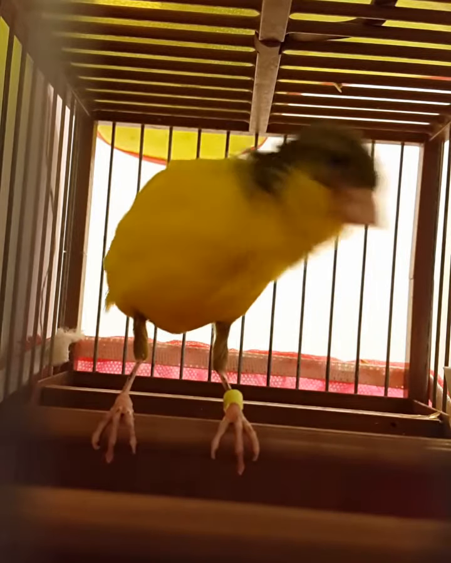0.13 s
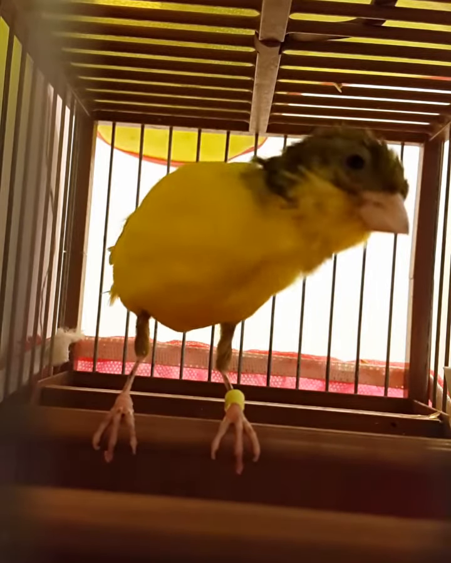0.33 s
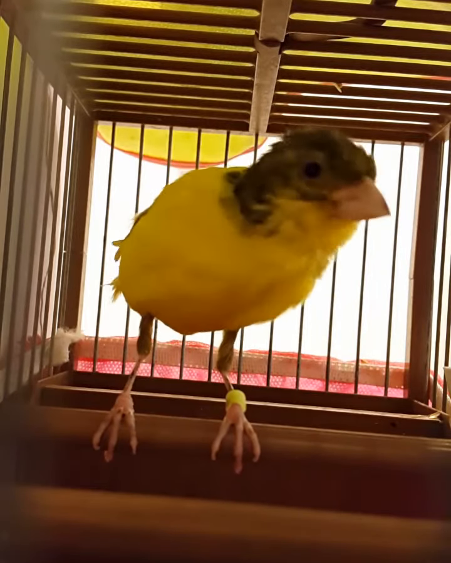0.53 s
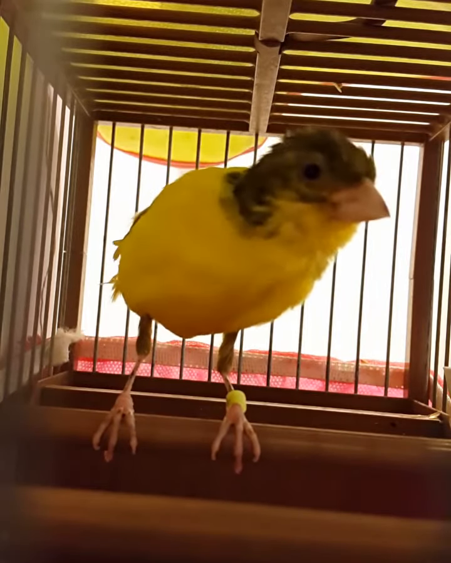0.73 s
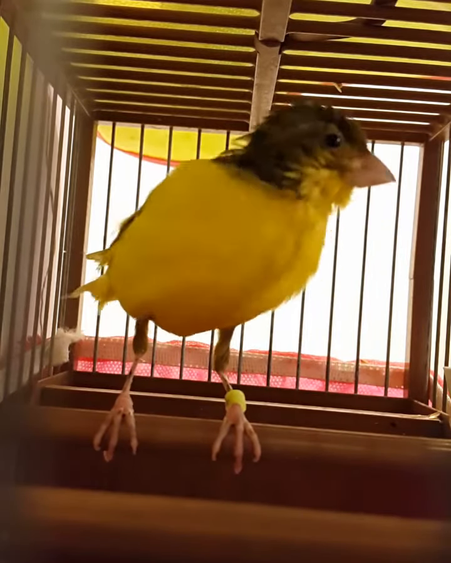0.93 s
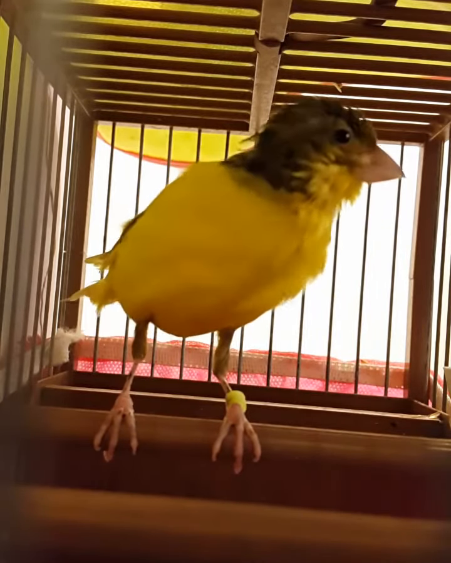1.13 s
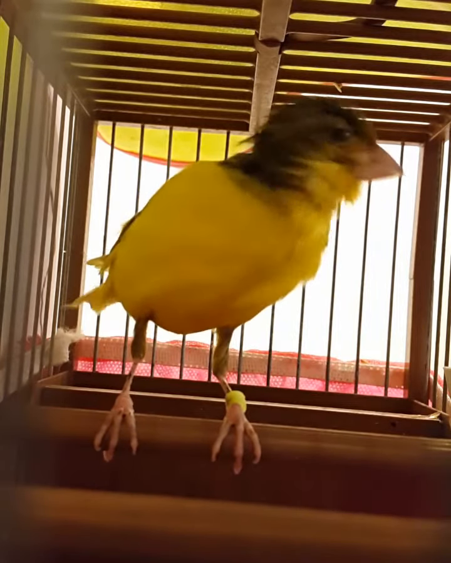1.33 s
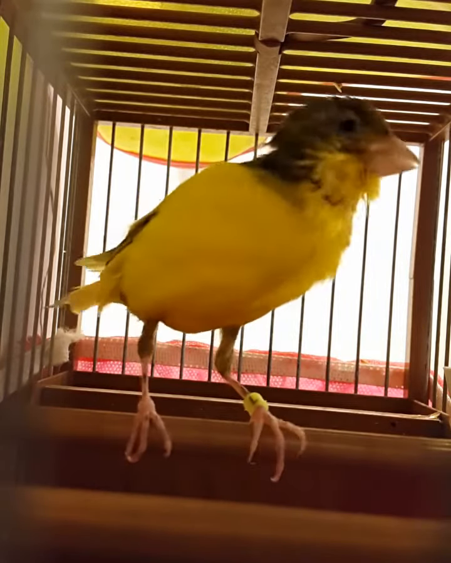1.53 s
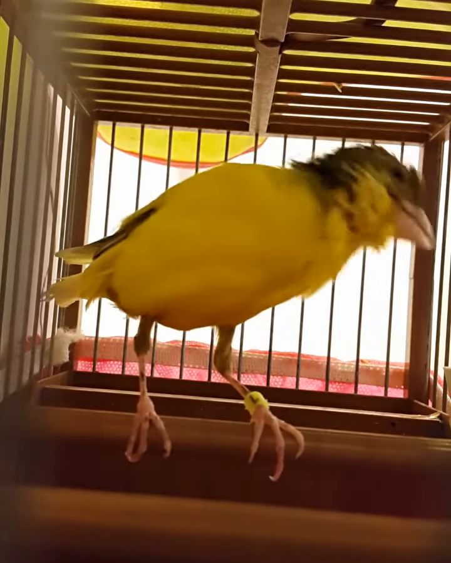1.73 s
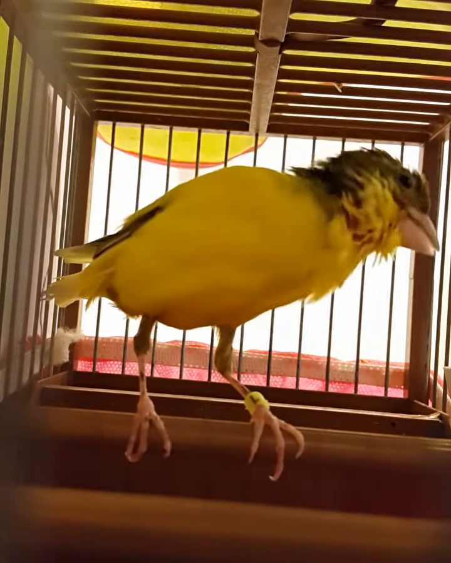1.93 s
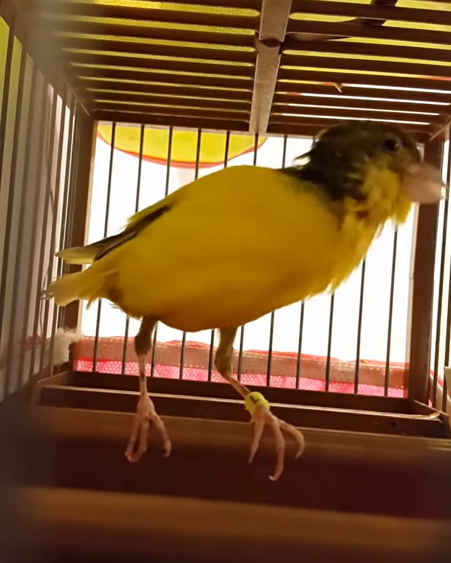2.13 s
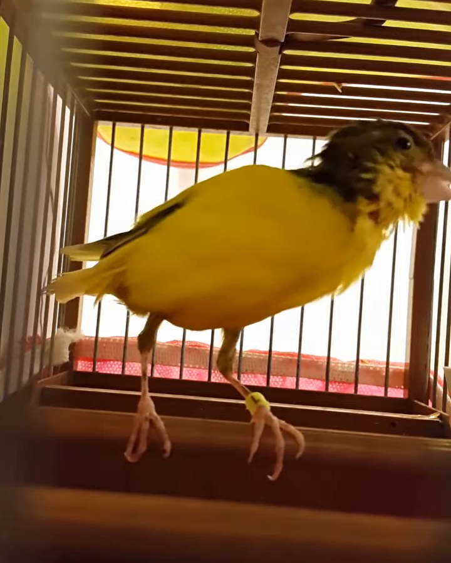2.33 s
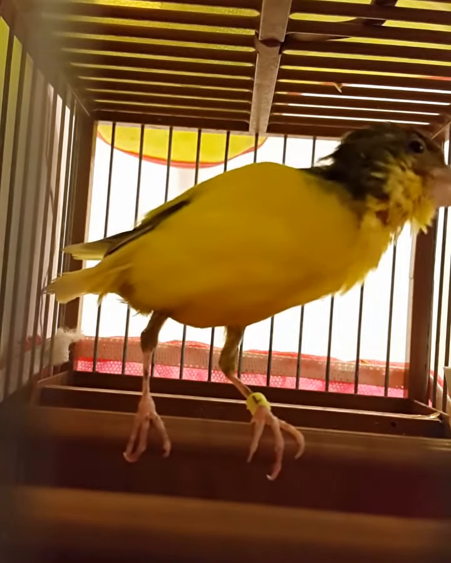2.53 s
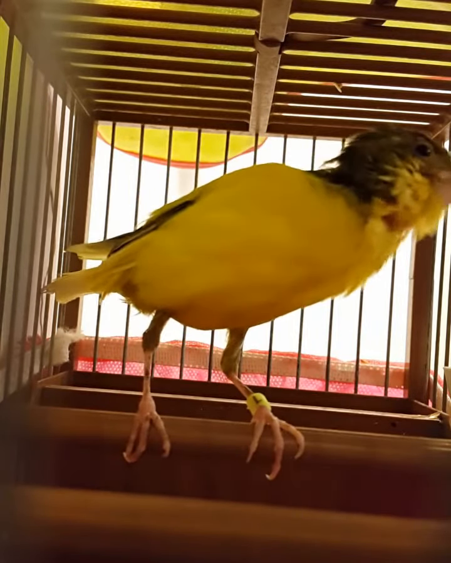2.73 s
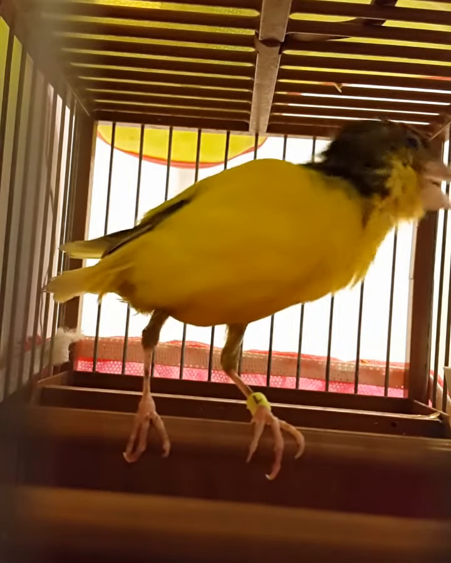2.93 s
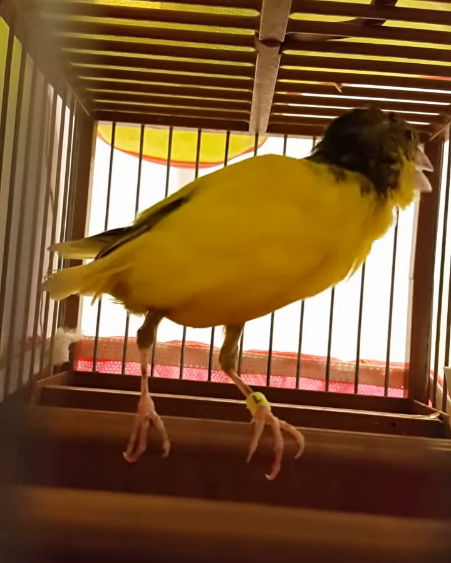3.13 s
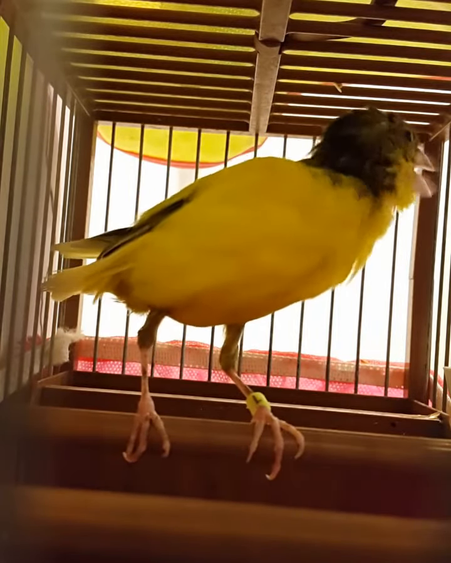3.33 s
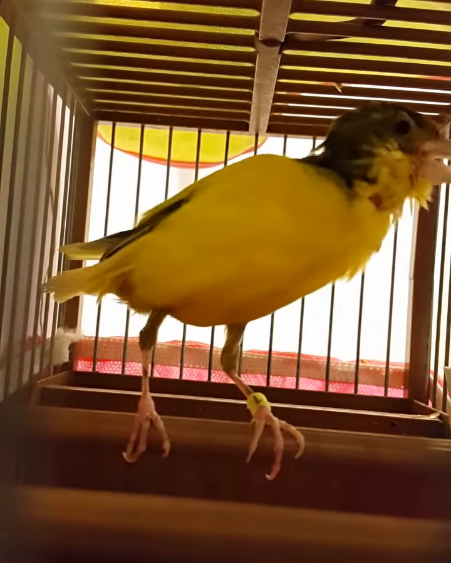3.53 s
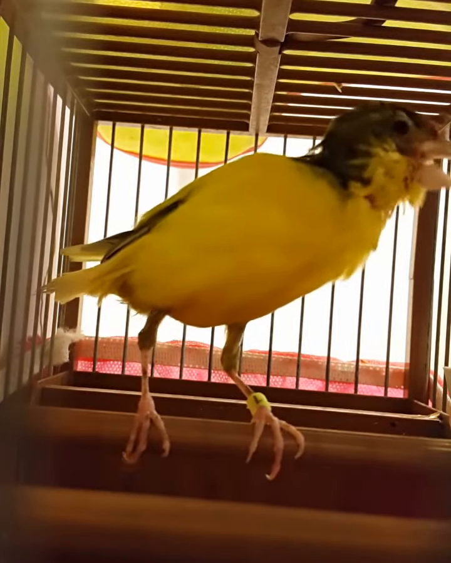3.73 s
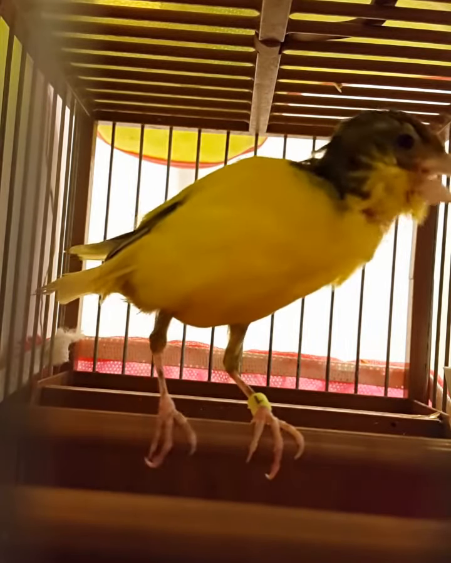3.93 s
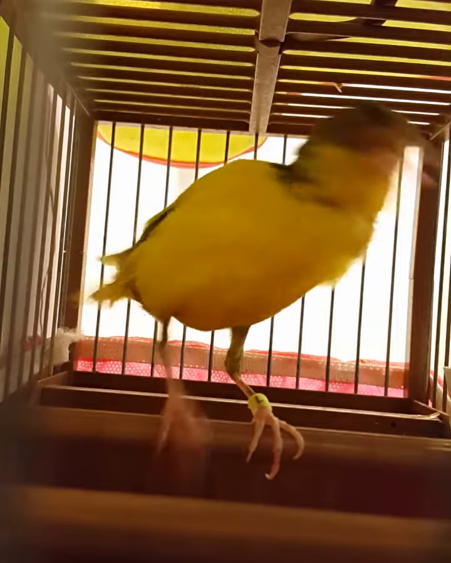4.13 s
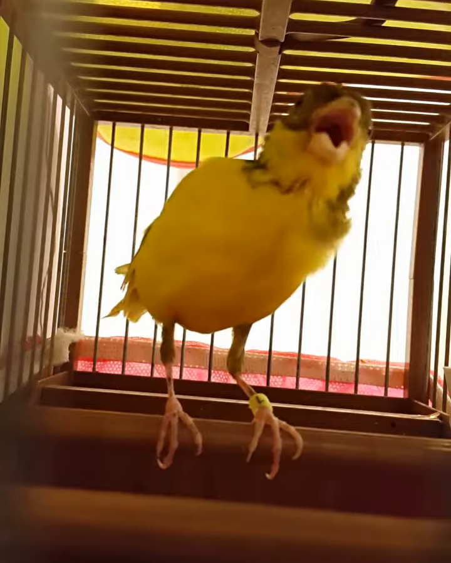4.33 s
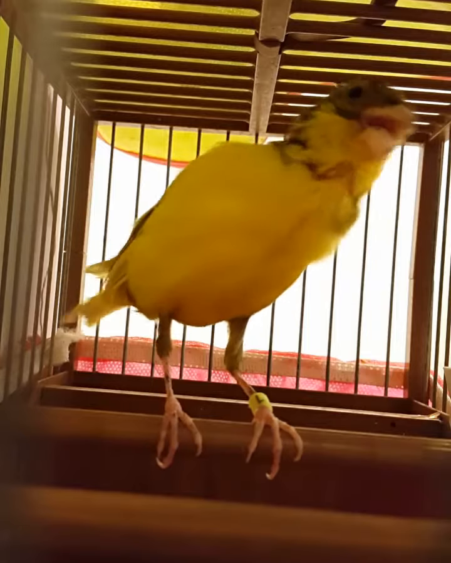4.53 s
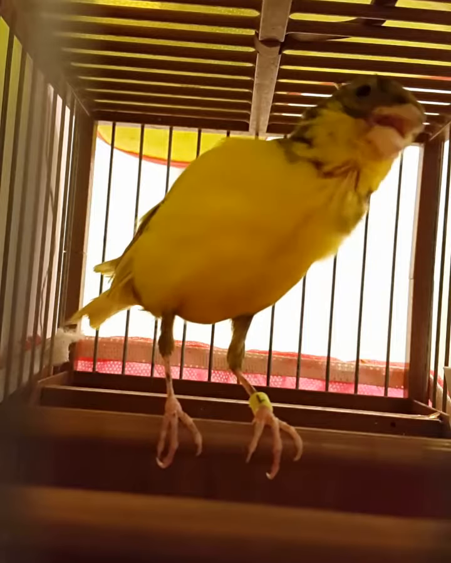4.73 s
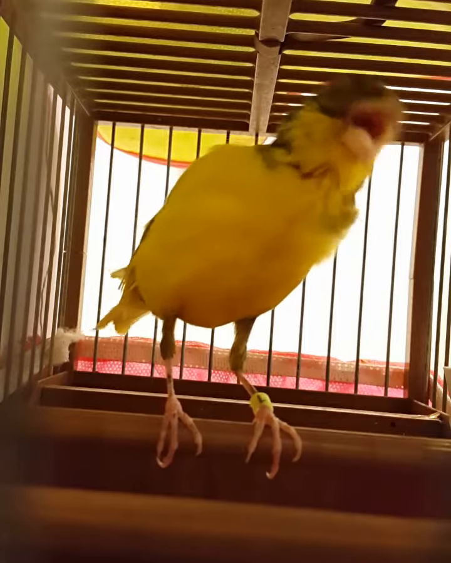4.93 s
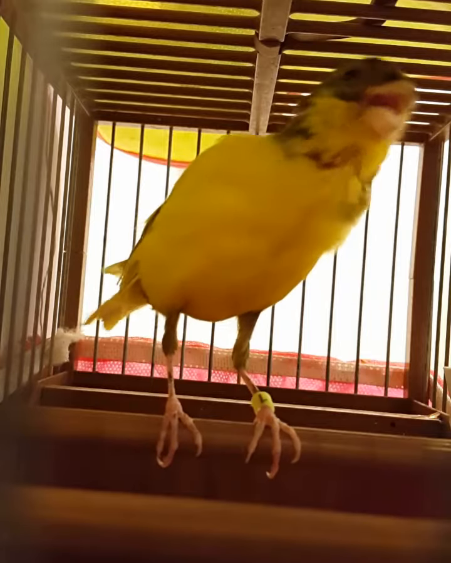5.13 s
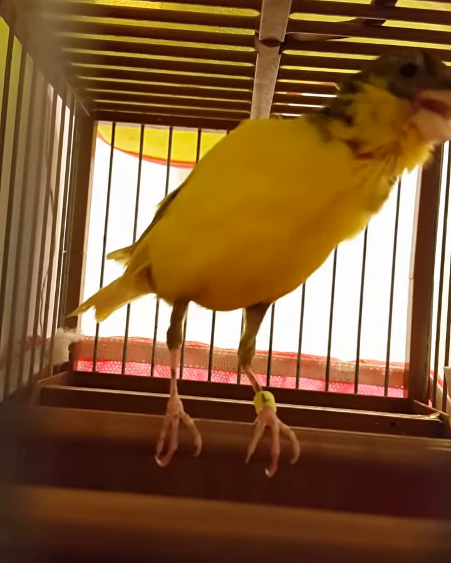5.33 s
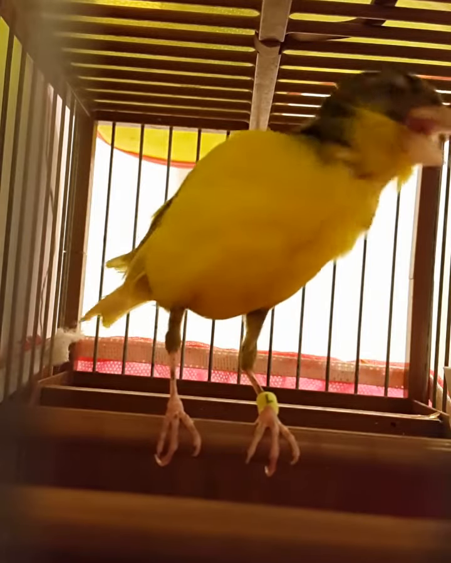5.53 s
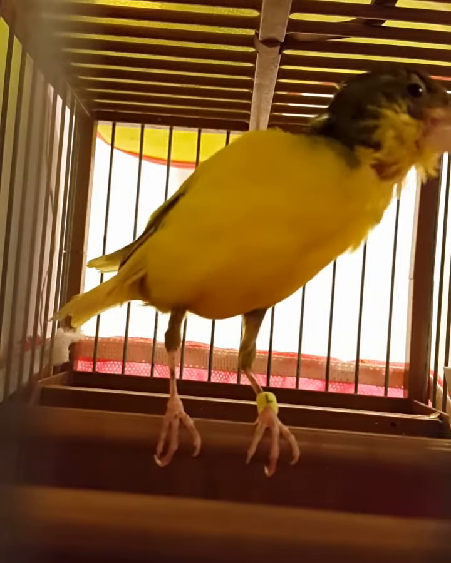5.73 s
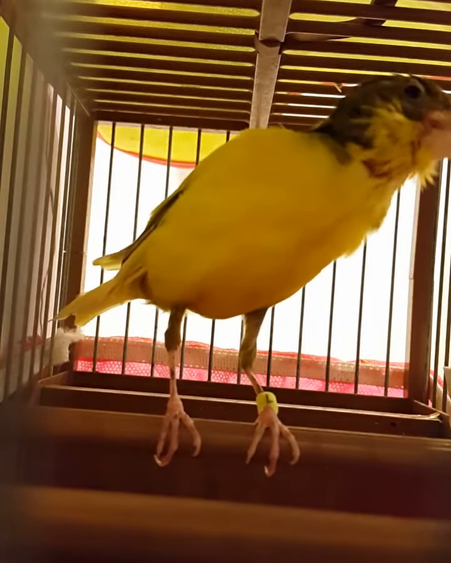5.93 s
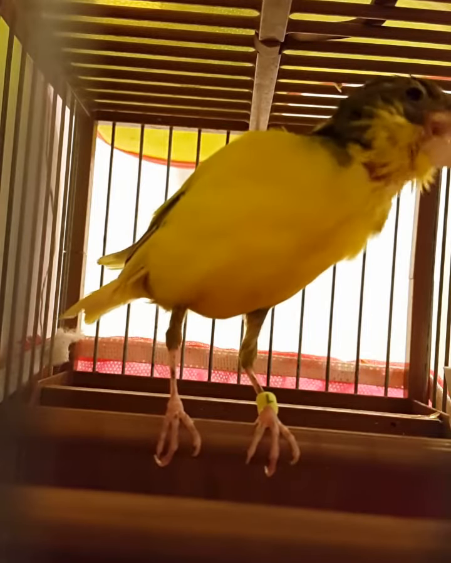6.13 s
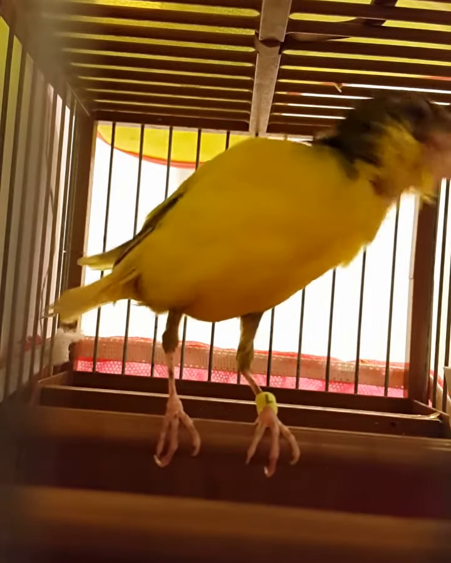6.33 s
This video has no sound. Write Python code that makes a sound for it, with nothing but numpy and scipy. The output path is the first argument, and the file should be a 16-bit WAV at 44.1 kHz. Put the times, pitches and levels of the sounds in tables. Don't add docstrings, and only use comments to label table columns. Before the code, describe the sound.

Quiet street rumble and tiny cage ticks, then a nearby canary whistles piercingly three times and breaks into a rapid two-note trill.

```python
import sys
import numpy as np
from scipy import signal
from scipy.io import wavfile
from scipy.ndimage import uniform_filter1d

SR = 44100
rng = np.random.default_rng(int(sys.argv[2]) if len(sys.argv) > 2 else 0)


def store_wav(level_fs):
    pcm = np.round(np.clip(np.atleast_2d(level_fs), -1, 1) * 32767)
    wavfile.write(sys.argv[1], SR, pcm.T.astype(np.int16))


def field_ratio(decibels):
    return 10 ** (np.asarray(decibels, dtype=float) / 20)


N = 286209

# freq_hz, level_db (per Hz)
AIR_SPECTRUM = [(24, -35.5), (41, -21), (53, 1.5), (80, -12), (116, 0.5), (150, -6), (350, -9),
                (420, -15.5), (1000, -22.5), (3800, -36.5), (4700, -27.5), (6600, -32), (7300, -41.5),
                (15600, -40)]
# freq_hz, likeness (0 to 1)
AIR_LIKENESS = [(60, 0.9), (180, 1), (550, 0.3), (1650, 0.19), (4970, 0.23), (15000, 0.02)]
# freq_hz, left_over_right_db
AIR_LEAN = [(60, 0.5), (180, 2.5), (550, 0.5), (1650, 0), (4970, 9), (15000, 0)]
# start_s (centre), spread_s, level_db (over the air), centre_hz
SWISHES = [
    (0.05, 0.42, -5, 1200),
    (2.619, 0.28, 0.5, 2700),
    (3.542, 0.22, 10, 1200),
    (5.852, 0.14, 5.5, 1900),
    (2.25, .2, 4.5, 70),
    (4.12, .13, 4, 80),
    (5.35, .12, 4.5, 2300),
]
# start_s, peak_db, ring_hz, snap_top_hz, left_over_right_db
TICKS = [(.109, -50, 1370, 2500, -5), (.139, -55.5, 1220, 1800, -12), (0.488, -39, 224, 350, 3),
         (1.584, -41, 310, 4500, -14.5), (1.661, -60.5, 5800, 6500, 6), (1.721, -60, 6000, 6500, 6),
         (2.389, -42.5, 210, 896, 1), (2.704, -58.5, 495, 4000, 11), (3.814, -34.5, 176, 1440, 1.5),
         (4.756, -36.5, 190, 3200, 21), (5.516, -42, 190, 1500, 29), (5.975, -56.5, 2740, 5000, 5)]
# start_s, length_s, pitch_hz, glide_hz, level_db
HOOTS = [(.0, 0.052, 482, 46, -60), (0.301, 0.27, 255.2, -0.5, -58), (0.302, 0.23, 955, -11, -70),
         (1.127, 0.068, 350, -3, -58), (1.716, 0.087, 422, 1.5, -57.5), (2.068, 0.082, 462, 25.5, -59),
         (2.2, 0.045, 463, -4.5, -58), (3.18, 0.13, 191.3, 54, -52.5), (3.236, 0.19, 251, -13, -49),
         (3.404, 0.06, 221, -32, -55.5), (.435, 0.038, 3400, -40, -73), (.5, 0.055, 2780, -58, -75),
         (.55, .06, 2500, -30, -75), (1.338, 0.053, 2390, -100, -72.5), (2.447, 0.079, 2150, 399.5, -71),
         (5.784, 0.13, 1935, -120, -68)]
# freq_hz, t60_s
ROOM_DECAY = [(4000, 0.23), (7000, 0.25), (15000, 0.2)]
# time_s, pitch_hz, level_db
WHISTLES = [
    [(1.33, 5450, -57), (1.42, 5296, -47), (1.5, 5102, -27.5), (1.7, 4973, -23), (1.9, 5062, -23.5),
     (2.02, 5000, -20.5), (2.08, 4895, -19), (2.205, 4967, -20.5), (2.24, 5129, -20.5)],
    [(2.315, 6830, -52.5), (2.345, 6380, -40), (2.37, 6110, -22), (2.44, 6058, -20), (2.495, 6120, -18),
     (2.655, 5793, -23.5), (2.697, 5990, -18.5), (2.725, 5676, -20), (2.758, 5625, -23.5)],
    [(2.815, 6500, -45.5), (2.85, 6760, -40), (2.885, 6814, -15.5), (3.03, 7007, -19), (3.1, 7044, -17.5),
     (3.135, 6970, -19.5), (3.146, 6550, -26.5)],
]
# time_s, beats (counted so far), pitch_swing_hz
FLUTTER = [
    [(1.33, -13, 8), (1.512, 0, 16), (1.629, 8, 20), (1.661, 10, 14), (1.753, 15, 14), (1.838, 23, 45),
     (1.875, 27, 30), (1.947, 34, 50), (2.024, 41, 55), (2.07, 44, 40), (2.102, 46, 28), (2.201, 56, 38),
     (2.237, 59, 15)],
    [(2.31, -6, 6), (2.394, 0, 10), (2.453, 4, 20), (2.528, 9, 12), (2.603, 15, 35), (2.652, 18, 25),
     (2.703, 21, 90), (2.722, 23, 35), (2.756, 26, 15)],
    [(2.81, -9, 6), (2.926, 0, 14), (2.965, 3, 12), (3.001, 5, 7), (3.02, 6, 16), (3.06, 9, 18),
     (3.082, 10, 16), (3.144, 14, 12)],
]
# start_s, length_s, pitch_hz, glide_hz, level_db
LOW_NOTES = [(3.216, 0.041, 5090, -240, -23), (3.33, 0.053, 5027, 46.5, -19),
             (3.474, 0.044, 5028, -3.5, -15.5), (3.614, 0.048, 5015, -11.5, -14.5),
             (3.759, .048, 5075, 124, -13), (3.903, 0.047, 5013, -103, -13),
             (4.053, 0.046, 5013, 40.5, -13), (4.202, 0.046, 5005, 62, -13),
             (4.345, 0.047, 4988, 51.5, -9.5), (4.496, 0.046, 4964, -42, -10),
             (4.643, 0.045, 4948, -22.5, -11), (4.787, 0.051, 4957, 7, -10),
             (4.943, 0.044, 4989, -44, -9.5), (5.089, 0.048, 4914, 26, -9.5),
             (5.241, 0.046, 4934, -32.5, -11), (5.39, .051, 4933, -111, -12.5),
             (5.542, 0.057, 4864, 17, -13.5), (5.688, 0.051, 4876, 47, -12),
             (5.842, 0.048, 4820, 15.5, -11.5), (5.987, 0.049, 4837, 23, -11),
             (6.138, 0.048, 4885, 66.5, -11), (6.289, 0.048, 4873, 38.5, -11.5),
             (6.444, 0.045, 4845, -90.5, -12.5)]
# start_s, length_s, pitch_hz, glide_hz, arch_hz
HIGH_NOTES = [(3.272, .047, 5900, 217.5, 52), (3.411, 0.053, 6104, -22.5, 3),
              (3.554, 0.055, 6023, 76.5, -17), (3.698, .051, 6008, 22, -48), (3.839, .056, 6032, -71, -113),
              (3.986, 0.05, 6123, 11.5, 79.5), (4.135, .047, 6068, 47, -15),
              (4.279, 0.048, 6315, -106, 26.5), (4.426, .051, 6250, -103, 63.5),
              (4.577, 0.044, 6356, 40, -60), (4.724, 0.045, 6275, -59.5, 87.5),
              (4.872, .049, 6334, -57, 77.5), (5.02, .051, 6336, -56.5, 41), (5.171, .046, 6350, 190.5, 82),
              (5.323, 0.052, 6536, 315, 300), (5.475, .05, 6187, -230, 290), (5.621, .051, 6103, -76.5, 58),
              (5.772, .052, 6070, 214, -44.5), (5.923, .055, 6215, 189, 319), (6.069, .047, 5972, -234, 19),
              (6.221, .055, 5836, -183, -148), (6.375, 0.051, 5931, -57.5, -13)]
# time_s, depth_db
CATCHES = [(1.645, 10), (1.663, 18.5), (1.683, 5), (1.721, 15.5), (1.753, 8.5), (1.875, 10.5), (1.946, 8),
           (2.142, 15), (2.528, 13), (2.603, 8), (2.637, 13.5), (2.654, 23.5), (2.674, 8.5), (2.69, 16),
           (2.704, 12), (3.032, 9), (3.048, 4.5), (3.243, 15.5), (3.887, 13), (3.954, 9), (4.021, 13),
           (4.085, 5), (4.675, 2.5), (4.897, 9.5), (5.121, 8), (5.269, 4), (5.365, 7.5), (5.659, 1.5),
           (5.87, 11), (5.952, 6), (6.015, 3), (6.261, 6)]
# time_s, second_overtone_db, left_over_right_db, left_lead_rad
BEAK = [(1.33, -16, 13.5, 1.5), (1.62, -35, 6.5, .7), (1.85, -25, 7.5, .3), (1.95, -23.5, 5, -1.26),
        (2.08, -39.5, 3, -1.9), (2.24, -21, 4, -1.7), (2.4, -44, 7.5, 0.9), (2.7, -34.5, 6.5, 1.6),
        (3.13, -37.5, 7, 1.47), (3.3, -24, 4, -1), (3.64, -39.5, 6, 0.53), (3.93, -41.5, 6, -0.52),
        (4.23, -43, 6.5, -0.04), (4.42, -47, 13.5, 0.16), (4.7, -61.5, 6.5, .6), (5.2, -56, 9, .85),
        (5.55, -54, 4.5, 0.83), (5.71, -45.5, 6.5, -.3), (6.47, -44.5, 7.5, -.3)]
# time_s, level_db, second_overtone_db, left_over_right_db, left_lead_rad
HIGH_EFFORT = [(3.27, -15.5, -27.5, 10.5, 0.68), (3.6, -11.5, -34.5, 14, 1.9),
               (3.84, -11, -34.5, 12.5, 1.3), (4.0, -9.5, -26.5, 8.5, 1.1), (4.4, -8.5, -27, 8.5, 1.2),
               (4.9, -6.5, -22.5, 8, 2), (5.33, -10.5, -26, 8, 1.83), (5.55, -7.5, -23, 10.5, 1.9),
               (5.85, -10, -23, 8, 1.98), (6.4, -5, -40.5, 10, 2.3)]
# start_s, length_s, level_db
CRACKLE = [
    (4.304, .025, -35),
    (4.323, .014, -51),
    (4.382, 0.0042, -41.5),
    (4.45, 0.0023, -40.5),
    (4.455, 0.024, -36.5),
    (4.475, .011, -54.5),
    (6.486, 0.0026, -31),
]

AIR_DB = -49.5
STREET_DB, SWELL_DB, LULL_S, LULL_DB = 1.03, -0.8, 5.59, -9
ROOM_DULL_HZ = 9000
SHADOW_DB = 19.5
FLICK_HZ_PER_DB = 14
WHISTLE_THIRD_DB = -8
THIRD_DB, THIRD_FOLLOWS, THIRD_DB_PER_KHZ = -14, 0.32, -15.5
# (first sound, end of the rise, loss dB at first sound, power of the rise, swell dB)
LOW_RISE, HIGH_RISE = (-0.19, 0.63, 32.5, 3.5, 5.5), (-0.12, 0.42, 35, 3.5, 1.75)
# (place, width, depth dB)
LOW_DIP, HIGH_DIP = (0.65, 0.14, 4.3), (0.76, 0.013, 0.72)
# (Hz at first sound, place reached, power)
LOW_SCOOP, HIGH_SCOOP = (620, 0.031, 1.8), (-66, 0.19, 0.87)
STOP_AT, STOP_END, STOP_DB = 0.89, 1.05, 31.5
WOBBLE_DB = 0.7
REEDY_START = 0.43
BEND, SQUEEZE = 0.11, 0.064
CEILING = 0.8


def read(points, hz):
    f, value = np.transpose(points)
    return np.interp(np.log(hz + 1), np.log(f + 1), value)


def curve(rows, t):
    s, *columns = np.transpose(rows)
    return [np.interp(t, s, c) for c in columns]


def add(mix, s, sound):
    part = mix[..., round(s * SR):][..., :sound.shape[-1]]
    part += sound[..., :part.shape[-1]]


def smooth(x, width):
    return uniform_filter1d(uniform_filter1d(x, int(width)), int(width))


def drift(count, width):
    x = smooth(rng.standard_normal(count), width)
    return x / np.std(x)


def air():
    frames = N // 512 + 5
    t = np.arange(frames) * 512 / SR
    hz = np.fft.rfftfreq(2048, 1 / SR)[:, None]
    a, b, c, d, patches = rng.standard_normal((frames, 1025, 5)).T
    patches = uniform_filter1d(uniform_filter1d(patches, size=3, axis=0), size=5, axis=1)
    lull = np.clip((t - LULL_S) / 0.08 + 0.5, 0, 1)
    rumble_db = STREET_DB + SWELL_DB * drift(frames, 7.7) + LULL_DB * lull
    low = 1 / (1 + (hz / 500) ** 2)
    patchy_db = (1.8 + 0.6 * low) * patches / patches.std()
    level = field_ratio(read(AIR_SPECTRUM, hz) + low * rumble_db + patchy_db)
    swish = 0
    for s, spread, db, centre_hz in SWISHES:
        off_centre = np.log((hz + 1) / centre_hz) ** 2 / 1.5
        swish = swish + field_ratio(db) * np.exp(-((t - s) / spread) ** 2 - off_centre)
    same = np.clip(read(AIR_LIKENESS, hz), -1, 1)
    lean = field_ratio(read(AIR_LEAN, hz) / 2)
    late = np.exp(-2j * np.pi * hz * 0.00033)
    left = a + 1j * b
    right = late * (same * left + np.sqrt(1 - same ** 2) * (c + 1j * d))
    z = np.array([left * lean, right / lean]) * level * np.sqrt(1 + swish ** 2)
    x = signal.istft(z, nperseg=2048, noverlap=1536)[1][:, :N]
    return field_ratio(AIR_DB) * x / np.std(x[:, :SR])


def ticks():
    out, t = np.zeros((2, N)), np.arange(1500) / SR
    for s, peak_db, hz, top_hz, pan_db in TICKS:
        snap = signal.lfilter(*signal.butter(2, top_hz, fs=SR), rng.standard_normal(len(t)))
        snap *= field_ratio(-60 * t / 0.019) / snap.std()
        ring = np.sin(2 * np.pi * hz * t) * field_ratio(-60 * t / 0.028)
        sides_db = peak_db + np.array([[pan_db / 2], [-pan_db / 2]])
        add(out, s, field_ratio(sides_db) * (0.34 * snap + 1.35 * ring))
    return out


def hoots():
    out = np.zeros(N)
    for s, length, hz, glide, level_db in HOOTS:
        share = np.arange(0, 1, 1 / (length * SR))
        pitch = hz * (1 + 0.016 * drift(len(share), 260)) + glide * (share - 0.5)
        tone = np.sin(2 * np.pi * np.cumsum(pitch) / SR)
        add(out, s, field_ratio(level_db + 6.5) * tone * signal.windows.tukey(len(share), 0.6))
    return out * field_ratio(np.array([[1.5], [-1.5]]))


def room(x):
    taps = np.zeros((2, SR // 2))
    starts = np.arange(330, SR // 2 - 20, 20)
    at = starts + rng.integers(0, 20, (2, len(starts)))
    np.put_along_axis(taps, at, rng.choice([-1., 1.], at.shape), 1)
    hz, t, z = signal.stft(taps, SR, nperseg=256)
    hz = hz[:, None]
    z = z / (1 + (hz / ROOM_DULL_HZ) ** 4) * field_ratio(-60 * t / read(ROOM_DECAY, hz))
    tail = signal.istft(z, SR, nperseg=256)[1]
    tail *= field_ratio([[-20], [-18]]) / np.linalg.norm(tail, axis=1, keepdims=True)
    return signal.fftconvolve(x[None], tail, axes=1)[:, :N]


def syrinx(hz, level_db, pan_db, lead, overtones_db):
    turn = 2 * np.pi * np.cumsum(hz) / SR
    left, right = np.cos(turn), np.cos(turn - lead)
    for k, db in zip((2, 3), overtones_db):
        db = db + 2.2 * drift(len(turn), 70)
        left += field_ratio(db) * np.cos(k * turn)
        right += field_ratio(db - SHADOW_DB) * np.cos(k * (turn - lead))
    return np.sqrt(2) * field_ratio(level_db) * np.array([left, right * field_ratio(-pan_db)])


def beak(t, hz, extra_db=0):
    second_db, pan_db, lead = curve(BEAK, t)
    fade_db = THIRD_DB_PER_KHZ * np.maximum(hz - 5200, 0) / 1000
    third_db = THIRD_DB + extra_db + THIRD_FOLLOWS * second_db + fade_db
    return pan_db, lead, (second_db, third_db)


def falter(t):
    return sum(depth_db * np.exp(-((t - at) / 0.0025) ** 2) for at, depth_db in CATCHES)


def whistles():
    out = np.zeros((2, N))
    for rows, flutter in zip(WHISTLES, FLUTTER):
        t = np.arange(rows[0][0], rows[-1][0], 1 / SR)
        hz, level_db = curve(rows, t)
        beats, depth_hz = curve(flutter, t)
        beat = 2 * np.pi * beats + 0.45 * drift(len(t), 300)
        depth_hz = depth_hz * np.clip(1 + 0.38 * drift(len(t), 500), 0, 3)
        flick = depth_hz * (np.cos(beat + 0.6) + 0.35 * np.cos(2 * beat + 1.2))
        flick += FLICK_HZ_PER_DB * falter(t)
        level_db = level_db - 4.8 * np.tanh(depth_hz / 36) * np.cos(beat) - falter(t)
        pitch = hz + flick + 12 * drift(len(t), 51)
        tone = syrinx(pitch, level_db, *beak(t, hz, WHISTLE_THIRD_DB))
        add(out, t[0], tone * signal.windows.tukey(len(t), 0.02 / (t[-1] - t[0])))
    return out


def note(s, length, rise, dip, scoop):
    first, full, loss_db, power, swell_db = rise
    dip_at, dip_width, dip_db = dip
    scoop_hz, scoop_end, scoop_power = scoop
    share = np.arange(first, STOP_END, 1 / (length * SR))
    t = s + share * length
    shape_db = swell_db * share - loss_db * np.clip((full - share) / (full - first), 0, 1) ** power
    shape_db -= dip_db * np.exp(-((share - dip_at) / dip_width) ** 2)
    shape_db -= STOP_DB * np.clip((share - STOP_AT) / (STOP_END - STOP_AT), 0, 1) ** 2
    shape_db = smooth(shape_db, 70) - falter(t) + WOBBLE_DB * drift(len(t), 92)
    shape_db += 20 * np.log10(signal.windows.tukey(len(t), 0.08) + 1e-5)
    bend_hz = scoop_hz * np.clip((scoop_end - share) / (scoop_end - first), 0, 1) ** scoop_power
    return t, np.clip(share, 0, 1) - 0.5, shape_db, bend_hz + 16 * drift(len(t), 64)


def low_roll():
    out = np.zeros((2, N))
    for s, length, hz, glide, level_db in LOW_NOTES:
        t, mid, shape_db, bend_hz = note(s, length, LOW_RISE, LOW_DIP, LOW_SCOOP)
        pan_db, lead, (second_db, third_db) = beak(t, hz)
        second_db = second_db - REEDY_START * np.clip(shape_db, -20, 0) * (mid < 0)
        pitch = hz + glide * mid + bend_hz
        add(out, t[0], syrinx(pitch, level_db + shape_db, pan_db, lead, (second_db, third_db)))
    return out


def high_roll():
    out = np.zeros((2, N))
    for s, length, hz, glide, arch in HIGH_NOTES:
        t, mid, shape_db, bend_hz = note(s, length, HIGH_RISE, HIGH_DIP, HIGH_SCOOP)
        pitch = hz + glide * mid - 4 * arch * mid ** 2 + bend_hz
        level_db, second_db, pan_db, lead = curve(HIGH_EFFORT, t)
        add(out, t[0], syrinx(pitch, level_db + shape_db, pan_db, lead, [second_db]))
    return out


def scene():
    far = hoots()
    bird = whistles() + low_roll() + high_roll()
    echo = room(bird[0] + field_ratio(11.0) * far[0])
    return air() + ticks() + field_ratio(-0.7) * far + echo + bird


def top_cut(x):
    return signal.sosfilt(signal.butter(12, 15720, fs=SR, output="sos"), x)


def record(dry):
    high_pass = signal.butter(2, 600, "high", fs=SR, output="sos")
    bend = signal.sosfilt(high_pass, dry ** 2)
    x = dry + BEND * bend - SQUEEZE * dry ** 3
    swing = np.sqrt(2 * abs(smooth(x ** 2, 90)))
    x = x / (1 + (swing / CEILING) ** 8) ** (1 / 8)
    for s, length, level_db in CRACKLE:
        grit = rng.standard_normal(1200) * rng.exponential(1, 1200) / 1.49
        burst = signal.lfilter([1, -0.9], [1, -1.2, 0.55], grit)[:round(length * SR)]
        add(x[0], s, field_ratio(level_db) * burst * signal.windows.tukey(len(burst), 0.2))
    return top_cut(x)


dry = scene()
out = record(dry)
store_wav(out)
```